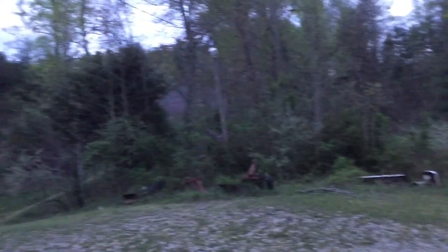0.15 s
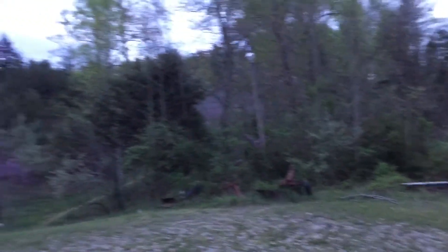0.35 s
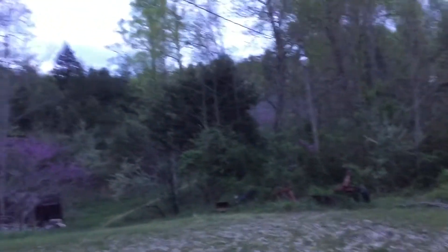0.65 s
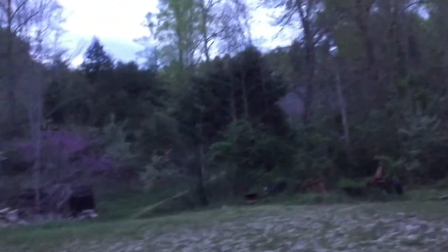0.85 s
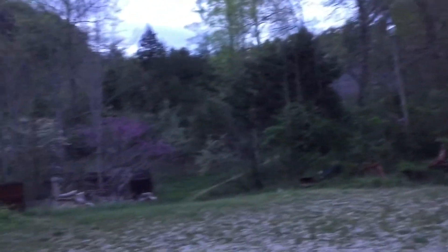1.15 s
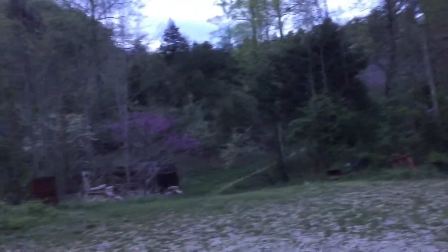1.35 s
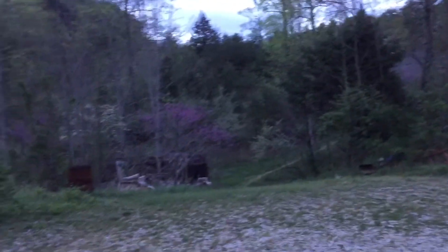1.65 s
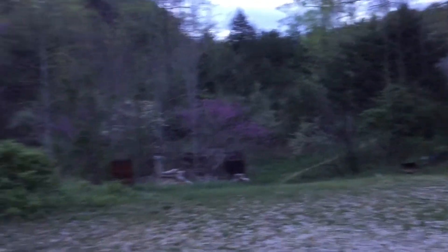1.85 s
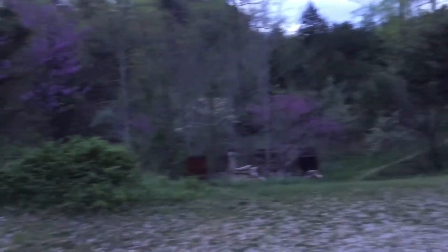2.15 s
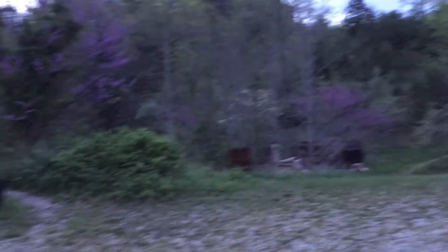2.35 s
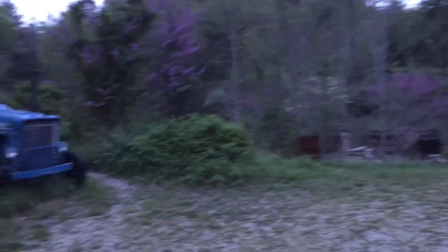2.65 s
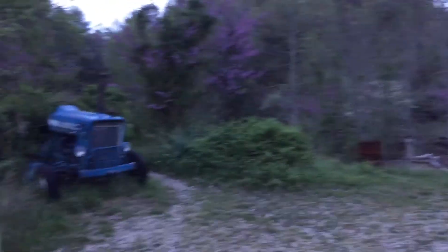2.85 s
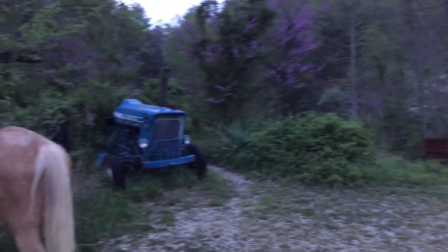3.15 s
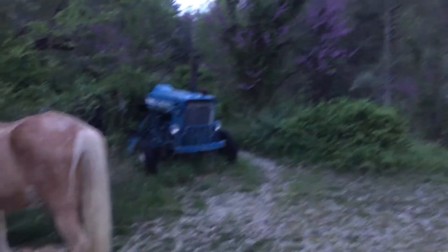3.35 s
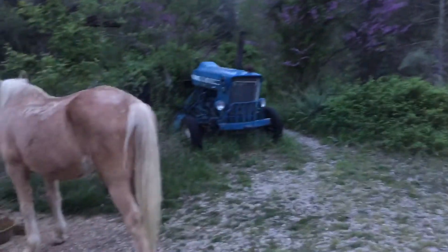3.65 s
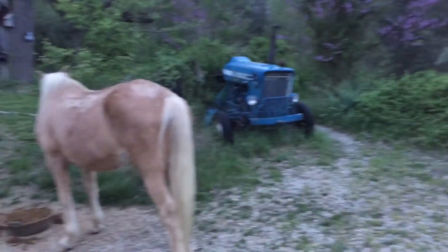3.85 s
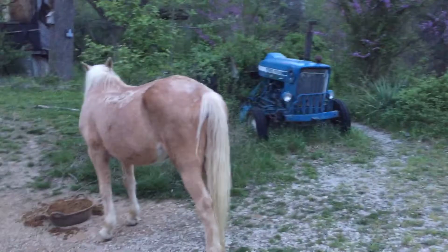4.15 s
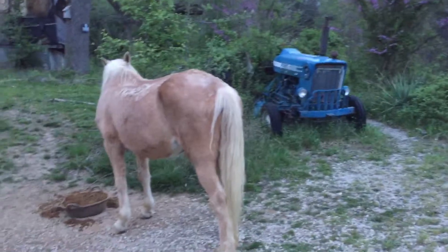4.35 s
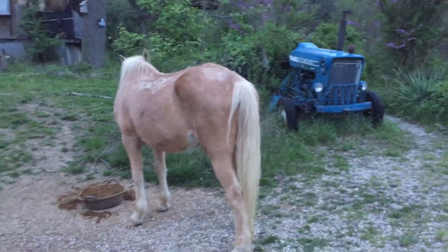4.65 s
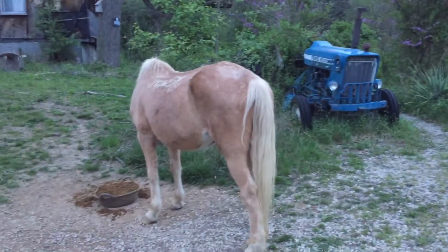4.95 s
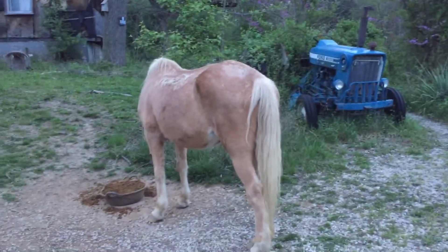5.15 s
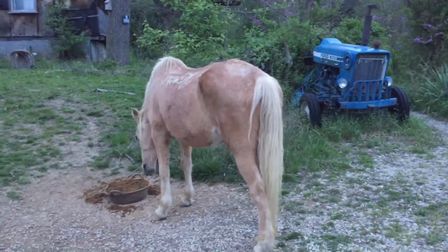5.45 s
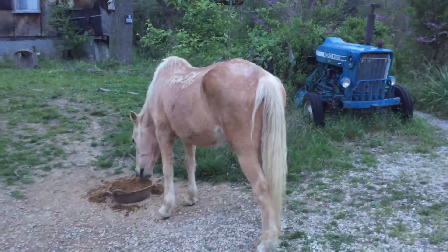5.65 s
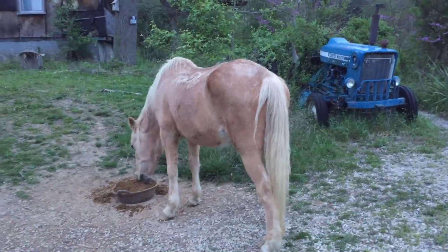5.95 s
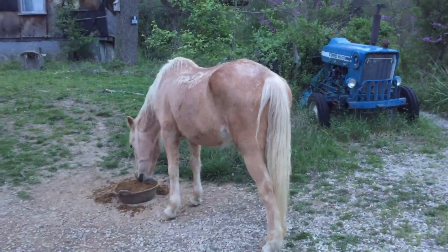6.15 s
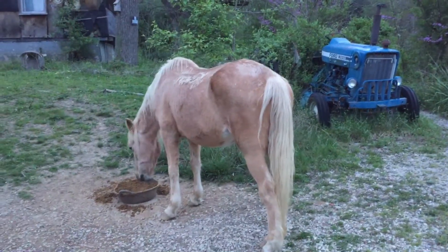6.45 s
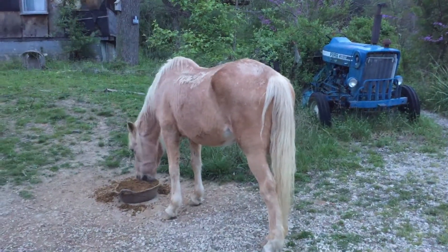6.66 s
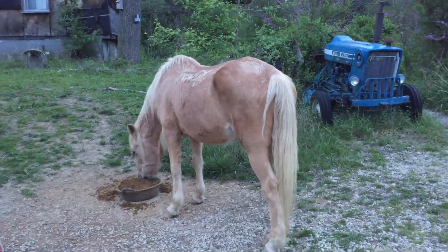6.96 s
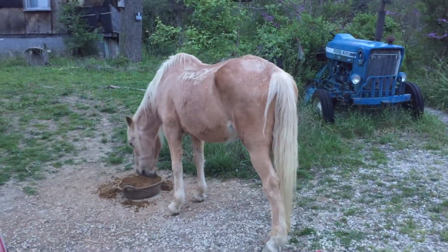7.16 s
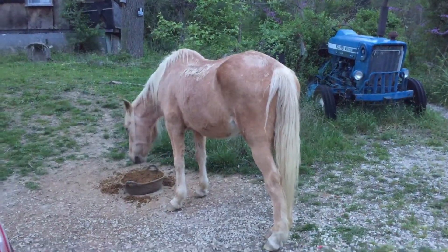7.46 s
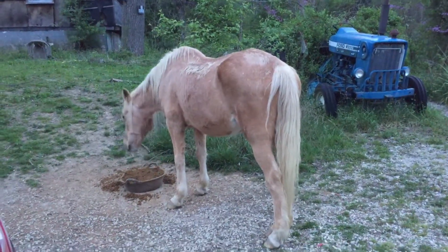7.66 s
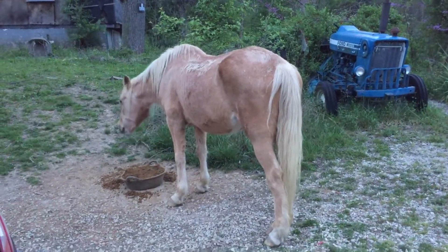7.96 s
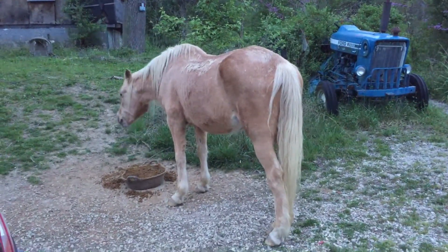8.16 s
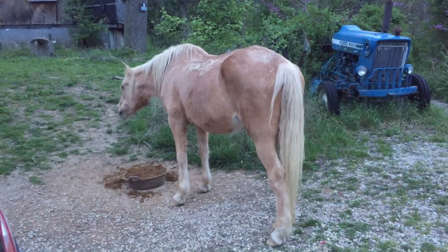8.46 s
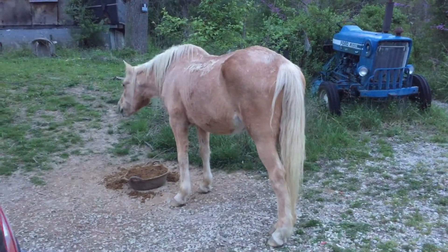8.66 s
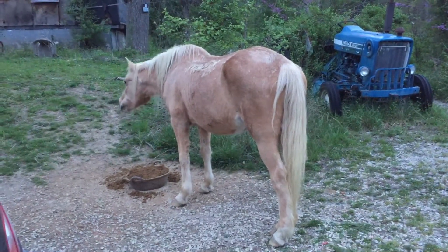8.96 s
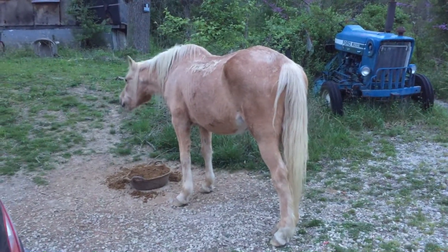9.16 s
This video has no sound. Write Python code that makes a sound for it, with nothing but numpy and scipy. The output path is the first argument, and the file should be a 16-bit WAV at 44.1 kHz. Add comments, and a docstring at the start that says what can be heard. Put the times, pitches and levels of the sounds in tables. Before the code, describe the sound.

A dense chorus of small frogs peeps from start to finish, each peep a short, high, rising whistle, with a few nearer frogs standing out. It is the loudest sound, growing somewhat fainter between about 1 and 4 seconds as the microphone turns away, then holding steady. Songbirds chirp from the outset, lightly echoed by trees. Short raspy notes come around 2.5 seconds and a diving whistle near 4. From 4 to 5.5 seconds the birds crowd in with a trill, rattles and ringing whistles. A few hard chips follow near 7 seconds, then a short lilting phrase. Around 9 seconds come another diving whistle, high slurs and a quick trill. Close by, soft dull knocks, light crackles and rustles come and go until about 7.5 seconds. Underneath are a quiet low rumble, faint handling bumps and a slight hiss.

```python
"""Dusk on a farm. From the start a dense chorus of small frogs peeps in a wet wood, each peep a short
rising whistle, over a low rumble and soft knocks and rustles close by. By 4 s the microphone has turned
away and the chorus is fainter. Songbirds, chirping from the outset, crowd in with rattles, whistles and
a ringing echo around 5 s, chip near 7 s and close with a diving whistle, slurs and a trill. The calls are
frequency-modulated tones, scattered by the leaves and echoed by the trees."""
import sys
import numpy as np
from scipy import signal
from scipy.fft import rfft, irfft, next_fast_len
from scipy.io import wavfile
from scipy.ndimage import uniform_filter1d, map_coordinates

SR = 44100
rng = np.random.default_rng(int(sys.argv[2]) if len(sys.argv) > 2 else 0)


def transcribe(signal):
    """Save signal, clipped to [-1, 1], as a 16-bit WAV file at the path in sys.argv[1]."""
    frames = np.atleast_2d(signal).T
    limited = np.clip(frames, -1, 1)
    pcm = np.round(limited * 32767).astype(np.int16)
    wavfile.write(sys.argv[1], SR, pcm)


N = 411012
# a husky voice: random share of its pitch at full depth in the foliage, and its changes per second
HUSK, HUSK_RATE = .04, 700
HARSH_WAVER = .08  # random share of the pitch in a harsh note


def amp(db):
    """The decibel scale: 20 dB is a factor of ten in amplitude."""
    return 10 ** (np.asarray(db) / 20)


def unit(x):
    """Normalisation to an rms of 1."""
    return x / np.sqrt(np.mean(x ** 2) + 1e-20)


def along(points, hz):
    """Interpolation of (frequency [Hz], value) points on a logarithmic frequency axis."""
    frequencies, values = np.transpose(points)
    return np.interp(np.log(hz + 1), np.log(frequencies + 1), values)


def filtered(x, response):
    """Linear filtering: the spectrum is multiplied by a frequency response."""
    size = next_fast_len(len(x) + 8192)
    return irfft(rfft(x, size) * response(np.fft.rfftfreq(size, 1 / SR)), size)[:len(x)]


def noise(spectrum):
    """Spectral shaping turns white noise into coloured noise of rms 1."""
    return unit(filtered(rng.standard_normal(N), lambda hz: amp(along(spectrum, hz))))


def puff(t, centre_hz, octaves):
    """Band-limited noise: a short stretch with a Gaussian spectrum on the octave scale."""
    band = lambda hz: np.exp(-.5 * (np.log2((hz + 1) / centre_hz) / octaves) ** 2)
    return unit(filtered(rng.standard_normal(SR // 2), band))[:len(t)]


def add(track, s, sound):
    """Superposition: a sound adds to the track from time s."""
    start = round(s * SR)
    part = sound[max(-start, 0):max(N - start, 0)]
    track[max(start, 0):][:len(part)] += part


def glide(length, start_hz, middle_hz, end_hz, edge=0.42, waver=0.0, waver_rate=250):
    """Frequency modulation: a tone follows a parabola through three pitches, with a random waver."""
    u = np.linspace(0, 1, max(round(length * SR), 2))
    hz = start_hz * (1 - u) * (1 - 2 * u) + middle_hz * 4 * u * (1 - u) + end_hz * u * (2 * u - 1)
    if waver:
        knots = rng.standard_normal(128)
        hz = hz * (1 + waver * np.interp(u * length * waver_rate, np.arange(len(knots)), knots))
    ramp = np.clip(2 * np.minimum(u, 1 - u) / edge, 0, 1)  # edge: share spent swelling and fading
    cycles = np.cumsum(hz) / SR + rng.random()
    return np.sin(np.pi / 2 * ramp) ** 2 * np.sin(2 * np.pi * cycles)


def foliage(sound, depth, t60=0.078, build=0.003, uneven_db=9):
    """Multipath scattering by leaves and twigs; depth (0-1) is the scattered share of the energy."""
    t = np.arange(SR // 6) / SR
    fine, strength = rng.standard_normal((2, len(t)))
    paths = fine * amp(uneven_db * strength - 60 * t / t60) * (1 - np.exp(-t / build))
    scattered = signal.fftconvolve(sound, paths)
    scattered *= np.linalg.norm(sound) / np.linalg.norm(scattered)
    return np.sqrt(1 - depth) * np.pad(sound, (0, len(t) - 1)) + np.sqrt(depth) * scattered


def trees(x, early_db=5, early_t60=0.4, build=0.038):
    """Reverberation from trunks and leaves: early scatter and a tail, by new paths every 1/3 s."""
    # decay of the wood's echo: (frequency [Hz], reverberation time [s])
    wood_t60 = [(500, 0.2), (2500, 1), (4500, 0.7), (8000, 0.19), (13000, 0.27)]
    out, hop = np.zeros(N), SR // 3
    hz, t, spectra = signal.stft(rng.standard_normal((N // hop + 1, SR * 3 // 4)), SR, nperseg=256)
    decay = amp(-60 * t / along(wood_t60, hz)[:, None]) + amp(early_db - 60 * t / early_t60)
    tails = signal.istft(spectra * decay * (1 - np.exp(-t / build)), SR, nperseg=256)[1]
    crossfade = np.cos(np.pi / 2 * np.arange(-hop, hop) / hop) ** 2
    for start, tail in zip(range(0, N, hop), tails):
        piece = np.pad(x, (hop, 2 * hop))[start:start + 2 * hop] * crossfade
        add(out, (start - hop) / SR, signal.fftconvolve(piece, tail / np.linalg.norm(tail)))
    return out


def air(rumble_db=-74.5, deep_db=-75, hiss_db=-70, lumps_db=1.9, lumps_per_s=14):
    """Ambient noise: an amplitude-modulated rumble swells now and then under a faint, even hiss."""
    # spectrum of the swelling rumble: (frequency [Hz], relative density [dB])
    rumble_spectrum = [(40, -23.5), (85, 0), (140, 0.5), (200, -1.5), (300, -10.5), (600, -55), (1500, -58)]
    # spectrum of the deep rumble: (frequency [Hz], relative density [dB])
    deep_spectrum = [(20, -39), (30, -24), (40, -7.5), (55, 0), (85, 1), (150, -11.5), (400, -46.5)]
    # spectrum of the hiss: (frequency [Hz], relative density [dB])
    hiss_spectrum = [(100, -3), (300, 1.5), (580, -1), (850, -3.5), (1500, -4), (2300, -6.5), (3800, -6.5),
                     (6500, -10.5), (8500, -13.5), (10400, -17.5), (11500, -15.5), (15800, -19.5)]
    # swells of the rumble: (peak time [s], half width [s], rise [dB])
    swells = [(.28, 0.41, 12), (1.5, 0.4, 7.5), (2.7, 0.13, 3.5), (3.2, 0.084, 5.5), (5.05, 0.81, 4.5),
              (5.87, 0.28, 5), (6.5, 0.73, 3.5), (7.282, 0.17, 9)]
    t = np.arange(N) / SR
    knots = rng.standard_normal(int(t[-1] * lumps_per_s) + 4)
    lumps = amp(lumps_db * map_coordinates(knots, [t * lumps_per_s]))
    swell_db = sum(db * np.exp(-((t - s) / width) ** 2) for s, width, db in swells)
    rumble = amp(rumble_db + swell_db) * noise(rumble_spectrum) + amp(deep_db) * noise(deep_spectrum)
    return unit(lumps) * rumble + amp(hiss_db) * noise(hiss_spectrum)


def bumps(length=.06, centre_hz=145, octaves=0.32):
    """Handling noise: each soft bump is a half-sine pulse of low noise."""
    # bumps of handling: (time [s], level [dB])
    touches = [(0.069, -60), (.2, -60), (0.289, -62), (0.372, -57), (1.408, -57), (1.5, -65), (2.752, -66),
               (4.97, -71.5), (5.129, -63), (5.248, -64), (5.729, -58), (5.934, -61.5), (7.221, -67),
               (7.299, -61.5)]
    out, t = np.zeros(N), np.arange(round(length * SR)) / SR
    pulse = np.sin(np.pi * t / length)
    for s, db in touches:
        add(out, s - length / 2, amp(db) * unit(puff(t, centre_hz, octaves)) * pulse)
    return out


def crackle(centre_hz=800, pitch_spread_db=4, size_db=5.5, t60=.025, attack=0.0022, ticks_per_s=28):
    """Damped oscillations: tiny random ticks as feet shift and a horse noses its feed."""
    # spells of crackle: (start [s], end [s], median level [dB])
    spells = [(.2, 1.399, -63.5), (1.904, 2.702, -72), (4.196, 4.904, -67), (5.8, 7.402, -68.5)]
    out, t = np.zeros(N), np.arange(SR // 20) / SR
    for start, end, db in spells:
        count = round(ticks_per_s * (end - start))
        times = rng.uniform(start, end, size=128)
        for s, (pitch, size) in zip(times[:count], rng.standard_normal((128, 2))):
            tick = np.sin(2 * np.pi * centre_hz * amp(pitch_spread_db * pitch) * t)
            envelope = amp(db + size_db * size - 60 * t / t60) * (1 - np.exp(-t / attack))
            add(out, s, envelope * tick)
    return out


def knocks_and_rustles(t60=0.065, attack=0.0033, scuff_db=-17, rustle_db=2):
    """Damped resonance gives dull knocks, each with a scuff; swells of band noise give dry rustles."""
    # soft knocks close by: (time [s], relative level [dB], pitch [Hz])
    knocks = [(.035, -63, 446), (0.243, -45.5, 561), (.595, -59, 624), (0.776, -55, 864), (1.284, -44, 710),
              (1.652, -52.5, 465), (1.988, -56, 670), (2.069, -49, 643), (2.596, -51, 690),
              (4.306, -54, 573), (4.813, -49, 640), (5.832, -58.5, 515), (5.857, -47.5, 634),
              (5.88, -56, 564), (5.897, -48, 450), (6.023, -53, 965), (6.062, -50, 985), (6.064, -51, 530),
              (6.379, -49.5, 557), (6.642, -54.5, 600), (7.197, -46.5, 590), (7.338, -47.5, 610)]
    # brief rustles: (time [s], length [s], centre [Hz], width [octaves], relative level [dB])
    rustles = [(2.566, 0.092, 1270, 0.14, -68), (4.22, 0.45, 584, 0.11, -79.5),
               (4.618, 0.037, 12000, .2, -67), (4.668, 0.28, 585, 0.25, -73.5),
               (5.806, 0.17, 700, 1, -74.5), (6.057, 0.037, 1730, 0.39, -69), (7.475, 0.092, 8800, .8, -67),
               (7.509, 0.051, 1500, 0.19, -68.5)]
    out, t = np.zeros(N), np.arange(SR // 2) / SR
    for s, db, hz in knocks:
        body = 0.28 * np.sin(2 * np.pi * hz * t) + 0.53 * puff(t, hz, octaves=0.24)
        scuff = amp(scuff_db) * puff(t, 1.07 * hz, octaves=0.93)
        envelope = amp(db - 60 * t / t60) * (1 - np.exp(-t / attack))
        add(out, s, envelope * (body + scuff))
    for s, length, hz, octaves, db in rustles:
        swell = np.sin(np.pi * np.minimum(t / length, 1))
        add(out, s, amp(db + rustle_db) * swell * puff(t, hz, octaves))
    return out


def chirps(calls, length, start, end, depth):
    """Transposition: syllables of one contour start and end at set ratios of their middle pitch."""
    return [(s, length, start * hz, hz, end * hz, db, depth) for s, hz, db in calls]


def phrases(calls, motif, depth):
    """Time shift and gain: the syllables of a motif are placed once for each call."""
    return [(s + delay, *shape, db + stress_db, depth)
            for s, db in calls for delay, *shape, stress_db in motif]


def syllables():
    """Pitch contours of the songbirds' glides, each kind from its own depth in the foliage."""
    # short arched chirps: (time [s], pitch [Hz], level [dB])
    arches = [(.576, 5820, -60.5), (.802, 5300, -61), (1.448, 5420, -57.5), (1.524, 5930, -56),
              (1.994, 5670, -56.5), (2.237, 5530, -60), (3.43, 5730, -67), (4.532, 5770, -54),
              (4.853, 5650, -53), (6.02, 5500, -70), (6.075, 5560, -68.5), (7.39, 5870, -69),
              (7.58, 5940, -69), (8.08, 5620, -67.5), (8.285, 5600, -65.5), (8.499, 5520, -63),
              (8.642, 5610, -57.5), (8.718, 6860, -62.5), (8.966, 7560, -60.5)]
    # thin high slurs that drop and level off: (time [s], pitch [Hz], level [dB])
    high_slurs = [(3.72, 7450, -57.5), (4.943, 7180, -66), (6.47, 7230, -69), (7.385, 7560, -60),
                  (7.452, 7190, -54.5), (8.39, 8100, -70.5)]
    # quick rising chirps: (time [s], pitch [Hz], level [dB])
    rises = [(2.472, 5890, -58.5), (4.179, 5330, -65), (4.26, 6760, -54.5), (4.553, 2390, -61),
             (5.52, 7380, -62), (5.542, 6800, -63), (6.3, 6470, -67.5), (8.56, 3630, -59.5),
             (8.57, 5270, -57), (8.857, 6640, -53)]
    # quick falling chirps: (time [s], pitch [Hz], level [dB])
    falls = [(2.582, 6780, -65), (2.625, 4960, -73), (4.513, 3520, -51), (4.63, 4870, -56.5),
             (8.595, 4620, -69), (8.668, 6700, -63.5)]
    # a lower voice's falling whistles: (time [s], pitch [Hz], level [dB])
    low_falls = [(.567, 2310, -60), (.632, 2170, -64.5), (.897, 2210, -58.5)]
    # syllables of five motifs: (delay [s], length [s], start [Hz], middle [Hz], end [Hz], stress [dB])
    chatter = [(0, 0.023, 7380, 5580, 3930, -4.5), (0.02, 0.031, 4430, 3820, 4480, 2),
               (0.116, .021, 4700, 3950, 3200, -5)]
    chip_link = [(0, 0.045, 1837, 2930, 3880, 1), (0.036, 0.022, 3330, 4800, 6550, -0.5),
                 (.054, .026, 5620, 4370, 3500, 1)]
    long_slur = [(0, 0.11, 7240, 5950, 5280, 0.5), (.035, 0.066, 12750, 11430, 11300, -11.5)]
    warble = [(0, 0.083, 1830, 1720, 1650, -1), (.053, 0.11, 2280, 1860, 1480, -2),
              (0.15, 0.1494, 2150, 1995, 1974, 3), (.3, 0.091, 1680, 1907, 2480, -3)]
    lilt = [(0, 0.035, 2980, 2370, 1660, -5), (.075, 0.037, 2920, 2570, 2030, 2.5),
            (.103, 0.037, 1530, 1850, 2240, -15), (.13, .052, 2130, 2340, 2380, 3.5),
            (.205, 0.0554, 2070, 2320, 2400, -1)]
    # when each motif is sung: (time [s], level [dB])
    chatter_calls = [(2.133, -51.5), (2.515, -50)]
    chip_link_calls = [(6.616, -55.5), (6.87, -58.5)]
    long_slur_calls = [(8.778, -57), (9.01, -56)]
    warble_calls = [(3.372, -61)]
    lilt_calls = [(7.744, -51)]
    return (chirps(arches, length=.036, start=0.94, end=0.85, depth=0.39)
            + chirps(high_slurs, length=0.061, start=1.14, end=0.93, depth=0.535)
            + chirps(rises, length=0.032, start=.86, end=1.13, depth=0.83)
            + chirps(falls, length=0.04, start=1.18, end=0.7, depth=0.86)
            + chirps(low_falls, length=0.06, start=1.1, end=0.71, depth=.45)
            + phrases(chatter_calls, chatter, depth=0.44)
            + phrases(chip_link_calls, chip_link, depth=0.39)
            + phrases(long_slur_calls, long_slur, depth=0.72)
            + phrases(warble_calls, warble, depth=0.8)
            + phrases(lilt_calls, lilt, depth=.18))


def songbirds(tsip_db=3, echo_db=-5):
    """Quick, husky glides whose direct-to-reverberant ratio falls with the depth of the perch."""
    # one small bird's sharp upward calls: (time [s], relative level [dB])
    tsips = [(.399, -64.5), (0.601, -61), (.683, -66), (0.898, -65.5), (1.114, -68.5), (1.276, -69),
             (1.47, -68), (1.916, -66), (2.869, -65.5), (3.778, -59), (4.862, -63), (6.911, -64),
             (7.683, -67.5)]
    near, far = np.zeros(N), np.zeros(N)
    for s, *shape, db, depth in syllables():
        note = amp(db) * glide(*shape, edge=0.4, waver=HUSK * depth, waver_rate=HUSK_RATE)
        add(near, s, foliage(note, depth))
        add(far, s, (0.3 + depth) * note)
    for s, db in tsips:
        note = amp(db + tsip_db) * glide(0.014, 5500, 6800, 7200, edge=0.22)
        add(near, s, foliage(note, depth=0.39))
        add(far, s, note)
    return near + amp(echo_db) * trees(far)


def rasps(start=0.95, end=1.22, echo_db=-6):
    """Roughness: fast random frequency modulation makes a bird's climbing notes buzz."""
    # harsh rising notes: (time [s], length [s], pitch [Hz], level [dB])
    notes = [(2.314, 0.056, 3960, -52.5), (2.41, 0.037, 3780, -66), (2.714, .045, 3600, -51),
             (2.804, 0.038, 3700, -68), (6.714, 0.048, 3500, -61), (6.98, 0.033, 3320, -61)]
    song = np.zeros(N)
    for s, length, hz, db in notes:
        note = glide(length, start * hz, hz, end * hz, waver=HARSH_WAVER, waver_rate=2 * HUSK_RATE)
        add(song, s, amp(db) * foliage(note, depth=.35))
    return song + amp(echo_db) * trees(song)


def chips(echo_db=-6):
    """Spectral spreading: very short, wavering downsweeps are heard as hard, rough chips."""
    # syllables of a chip: (delay [s], length [s], start [Hz], middle [Hz], end [Hz], stress [dB])
    motif = [(0, .013, 7030, 5900, 4660, -7), (.006, 0.0182, 4780, 4146, 3720, 2.5)]
    # the bird's chips: (time [s], level [dB])
    calls = [(6.529, -53.5), (6.768, -50.5), (7.028, -52.5)]
    song = np.zeros(N)
    for s, *shape, db, depth in phrases(calls, motif, depth=.38):
        note = glide(*shape, waver=HARSH_WAVER, waver_rate=2 * HUSK_RATE)
        add(song, s, amp(db) * foliage(note, depth))
    return song + amp(echo_db) * trees(song)


def plunges(echo_db=3):
    """A pure whistle tips over and dives; its reverberant sound outweighs the direct sound."""
    # syllables of a dive: (delay [s], length [s], start [Hz], middle [Hz], end [Hz], stress [dB])
    motif = [(0, 0.062, 4930, 4690, 4340, -9), (0.051, .042, 4600, 3708, 2460, 1)]
    # the bird's diving calls: (time [s], level [dB])
    calls = [(3.898, -49), (8.751, -47.5)]
    song = np.zeros(N)
    for s, *shape, db, depth in phrases(calls, motif, depth=.3):
        add(song, s, amp(db) * foliage(glide(*shape, edge=0.26), depth))
    return song + amp(echo_db) * trees(song, early_db=8, early_t60=0.29, build=0.025)


def pulse_train(first, last, period, length, start_hz, middle_hz, end_hz, db, depth, ends_db):
    """Periodic repetition of one syllable, under an envelope that peaks in mid-run."""
    song = np.zeros(N)
    repeats = round((last - first) / period) + 1
    for k, place in enumerate(np.linspace(-1, 1, repeats)):
        note = glide(length, start_hz, middle_hz, end_hz, waver=HUSK * depth, waver_rate=HUSK_RATE)
        gain = amp(db + ends_db * place ** 2 + rng.normal(0, 1))
        add(song, first + k * period, gain * foliage(note, depth))
    return song


def trills(sweep_period=.0985, hook_db=-1.5, rattle_echo_db=-5, sweep_echo_db=-3):
    """Scattering smears pulse trains: rattles stay distinct, a sweeping trill is half lost in leaves."""
    # buzzes and rattles: (first [s], last [s], period [s], length [s],
    # start [Hz], middle [Hz], end [Hz], level [dB])
    rattle_runs = [(4.741, 5.347, .0505, .011, 4200, 4700, 5450, -56),
                   (4.743, 5.349, .0505, .013, 5400, 4800, 4150, -56),
                   (4.738, 4.955, .0195, .0146, 2600, 2450, 1890, -50.5),
                   (5.16, 5.33, .018, 0.0162, 2600, 2480, 2080, -50),
                   (3.5, 3.86, .06, 0.029, 1700, 1550, 1550, -65)]
    # runs of upsweeps interleaved with hooks: (first [s], last [s], hook delay [s], level [dB])
    sweep_runs = [(0.025, .33, -0.022, -58), (4.172, 4.47, 0.065, -57.5), (8.915, 9.217, 0.069, -55)]
    # the two syllables: (length [s], start [Hz], middle [Hz], end [Hz])
    upsweep, hook = (.05, 3680, 4550, 6480), (0.0079, 7530, 7110, 7200)
    rattles = sum(pulse_train(*run, depth=.6, ends_db=-6.5) for run in rattle_runs)
    sweeps = np.zeros(N)
    for first, last, hook_delay, run_db in sweep_runs:
        for delay, shape, db in [(0, upsweep, run_db), (hook_delay, hook, run_db + hook_db)]:
            sweeps += pulse_train(first + delay, last + delay, sweep_period, *shape, db,
                                  depth=.8, ends_db=-1)
    return rattles + sweeps + trees(amp(rattle_echo_db) * rattles + amp(sweep_echo_db) * sweeps)


def whistles(waver=0.021, pip_depth=.2):
    """Harmonic series: held notes, a chirp's ringing echo and nasal pips; depth adds flutter and echo."""
    # held notes, and the ringing echo of a falling chirp:
    # (time [s], length [s], start [Hz], middle [Hz], end [Hz], level [dB], depth [0-1])
    long_tones = [(4.33, .13, 3730, 3690, 3640, -57, .4), (4.68, .33, 4400, 4310, 4290, -67.5, .5),
                  (5.008, .11, 3500, 3700, 3700, -46.5, .3), (5.11, .075, 3720, 3680, 3620, -54, .5),
                  (5.425, .11, 3670, 3690, 3730, -49, .4), (5.8, .11, 3870, 3850, 3780, -70, .8),
                  (8.41, 0.23, 2015, 2005, 2008, -64, .02)]
    # nasal pips: (time [s], level [dB])
    pips = [(0.459, -62.5), (0.785, -61), (1.106, -58.5)]
    # contour of a pip: (length [s], start [Hz], middle [Hz], end [Hz])
    pip_shape = (.031, 1875, 1888, 2000)
    # harmonics 1 to 3 of each kind: (gain on the tone's level [dB])
    long_harmonics = [3.5, -27.5, -30]
    pip_harmonics = [-0.5, 2, -17.5]
    tones = [(*row, long_harmonics) for row in long_tones]
    tones += [(s, *pip_shape, db, pip_depth, pip_harmonics) for s, db in pips]
    near, far = np.zeros(N), np.zeros(N)
    for s, length, *pitches, db, depth, harmonics in tones:
        for k, harmonic_db in enumerate(harmonics, 1):
            tone = glide(length, *(k * hz for hz in pitches), edge=0.45,
                         waver=waver * depth, waver_rate=450)
            partial = amp(db + harmonic_db) * foliage(tone, depth)
            add(near, s, partial)
            add(far, s, (0.09 + depth) * partial)
    return near + trees(far)


def low_frogs(length=.14, rise_hz=230, echo_db=-3):
    """Deeper, hoarser frogs far back in the wood, heard mostly as scattered sound."""
    # peeps below the chorus: (time [s], pitch [Hz], level [dB])
    peeps = [(0.064, 2580, -55), (.84, 2576, -55), (1.65, 2550, -52), (2.279, 2530, -60),
             (2.432, 2560, -57), (2.89, 2550, -61.5), (3.14, 2590, -60.5), (3.48, 2565, -55.5),
             (3.919, 2566, -61.5), (4.399, 2624, -58), (5.84, 2546, -62), (6.291, 2600, -62.5),
             (6.841, 2594, -58), (7.4, 2620, -64), (8.241, 2590, -61), (8.539, 2610, -58.5),
             (8.861, 2635, -65)]
    calls = np.zeros(N)
    for s, hz, db in peeps:
        peep = glide(length, hz - rise_hz / 2, hz, hz + rise_hz / 2, waver=.018)
        add(calls, s, amp(db) * foliage(peep, depth=0.75))
    return calls + amp(echo_db) * trees(calls)


def near_frogs(rise_hz_per_s=2500, echo_db=-8):
    """Peeps and brief flares rise at one sweep rate; the fainter they are, the more is scattered."""
    # peeps of the nearest frogs, and brief loud flares where peeps overlap:
    # (time [s], length [s], pitch [Hz], level [dB])
    peeps_and_flares = [(0.0, .1, 3238, -43), (.205, 0.13, 2870, -38), (0.237, 0.059, 3068, -34),
                        (0.249, 0.036, 2883, -34.5), (0.301, .085, 3040, -47.5), (.335, .09, 2850, -42),
                        (.43, 0.1, 2966, -38.5), (0.458, .11, 3134, -39), (0.506, .07, 2877, -41.5),
                        (.55, 0.077, 3077, -43.5), (0.613, .11, 2930, -40.5), (.735, 0.15, 2790, -43),
                        (.8, 0.082, 3124, -46.5), (0.918, 0.031, 2924, -35), (0.931, 0.074, 3050, -47),
                        (0.995, .11, 3074, -44.5), (1.128, 0.11, 2885, -39), (1.151, 0.13, 3053, -39.5),
                        (1.286, .12, 2908, -43), (1.524, 0.027, 2940, -40), (1.525, 0.045, 3044, -44.5),
                        (1.766, 0.082, 2923, -41.5), (1.838, 0.12, 2980, -40), (2.534, 0.099, 2930, -40),
                        (2.575, 0.13, 3217, -48.5), (2.67, .11, 2897, -41), (2.69, 0.0787, 3125, -47.5),
                        (3.038, .12, 3160, -46), (3.07, 0.053, 2924, -44), (3.379, .08, 2910, -49),
                        (3.5, .09, 2827, -51), (3.526, 0.091, 3220, -59), (3.72, 0.1, 3236, -49),
                        (4.189, 0.14, 3040, -48.5), (4.31, 0.13, 3250, -58), (4.438, .11, 2760, -57),
                        (4.559, 0.13, 3156, -47), (4.921, 0.0814, 2894, -48), (5.026, .09, 2924, -49),
                        (5.32, 0.087, 3270, -54), (5.492, 0.073, 3123, -44), (5.904, 0.025, 2937, -36.5),
                        (5.94, .11, 3162, -47.5), (6.599, 0.089, 2986, -48.5), (6.707, .11, 3120, -48.5),
                        (7.15, 0.088, 3154, -46.5), (7.29, 0.1, 3130, -46), (7.88, .11, 3153, -44),
                        (7.98, .09, 3100, -47.5), (8.358, 0.067, 3090, -46.5), (8.373, 0.053, 2920, -41.5),
                        (8.8, 0.099, 3194, -47), (8.879, .08, 2930, -44), (8.977, 0.1, 3100, -46)]
    calls = np.zeros(N)
    for s, length, hz, db in peeps_and_flares:
        rise_hz = rise_hz_per_s * length
        tone = glide(length, hz - rise_hz / 2, hz + 12, hz + rise_hz / 2, edge=0.73)
        depth = np.interp(db, [-53, -38], [.38, .22])
        add(calls, s, amp(db) * foliage(tone, depth))
    return calls + amp(echo_db) * trees(calls)


def chorus(count=25, centre_hz=2965, spread_hz=160, rise_hz=280, length=.115, period=.7):
    """Incoherent summation: each frog peeps at its own pitch and pace; the farthest blur into noise."""
    # spectrum of the farthest frogs: (frequency [Hz], relative density [dB])
    far_spectrum = [(1900, -50), (2350, -31), (2550, -24), (2700, -9.5), (2850, -9), (3130, -7),
                    (3240, -2.5), (3340, -13.5), (3480, -58)]
    # brief lulls in the chorus: (time [s], dip [dB])
    lulls = [(.19, 3), (.75, 1), (1.48, 2), (2.45, 1), (2.87, 2.5), (5.8, 1.5), (6.27, 2), (7.05, 3),
             (8.68, 2), (9.29, 2.5)]
    level_db, far_db, echo_db, lull_half_width_s = -43, -10, -2, 0.073
    turn_start_s, turn_end_s, turn_loss_db = 0.63, 3.96, 5  # the microphone turns away from the wood
    calls, t = np.zeros(N), np.arange(N) / SR
    for hz in centre_hz + spread_hz * np.linspace(-1, 1, count):
        own_period = period * amp(rng.normal(0, 1))
        first = -own_period * rng.random()
        for k, (late, loud, sharp) in enumerate(rng.standard_normal((24, 3))):
            pitch = hz + 25 * sharp
            peep = glide(length, pitch - rise_hz / 2, pitch + 15, pitch + rise_hz / 2)
            add(calls, first + k * own_period + .04 * late, amp(1.5 * loud) * peep)
    crowd = unit(calls + amp(echo_db) * trees(calls)) + amp(far_db) * noise(far_spectrum)
    # the level is evened out over 0.1 s, as when frogs take turns
    power = np.abs(uniform_filter1d(crowd ** 2, size=4400))
    crowd /= np.sqrt(power + 1e-6)
    lull_db = sum(db * np.exp(-((t - s) / lull_half_width_s) ** 2) for s, db in lulls)
    turned = np.clip((t - turn_start_s) / (turn_end_s - turn_start_s), 0, 1)
    return amp(level_db - turn_loss_db * turned - lull_db) * crowd


def scene():
    """Superposition of frogs, birds and the yard at one microphone."""
    frogs = chorus() + near_frogs() + low_frogs()
    birds = songbirds() + rasps() + chips() + plunges() + trills() + whistles()
    return (frogs + birds + knocks_and_rustles() + crackle() + bumps() + air())[None]


def record(dry):
    """Band limiting: an ideal low-pass filter removes the highest treble."""
    top_hz = 15780
    return np.array([filtered(channel, lambda hz: hz < top_hz) for channel in dry])


dry = scene()
out = record(dry)
transcribe(out)
```